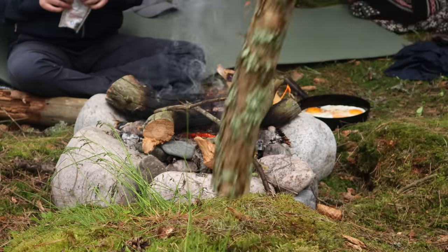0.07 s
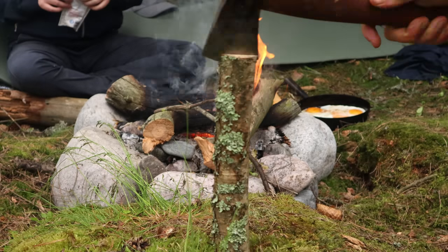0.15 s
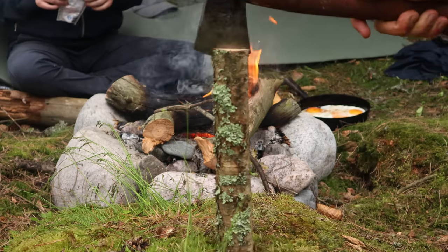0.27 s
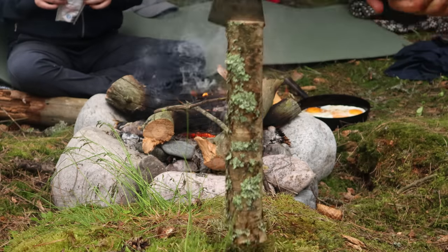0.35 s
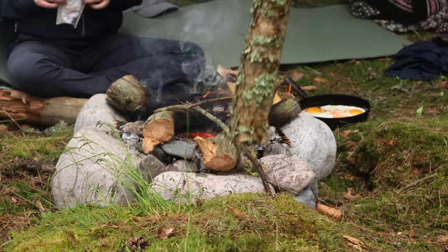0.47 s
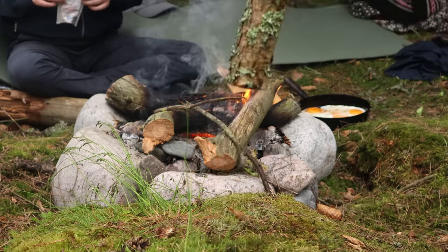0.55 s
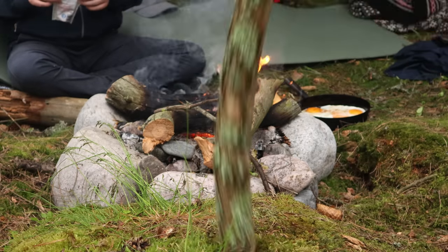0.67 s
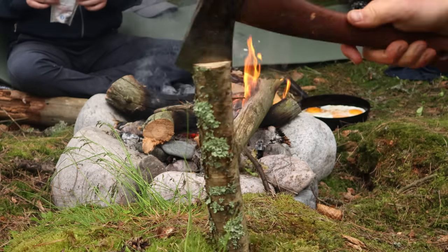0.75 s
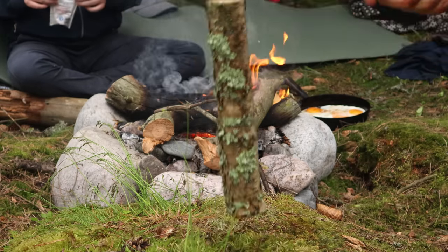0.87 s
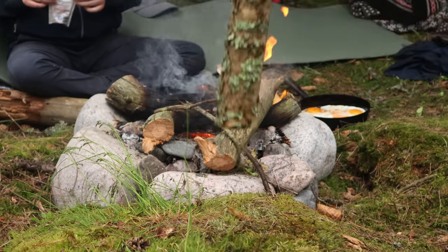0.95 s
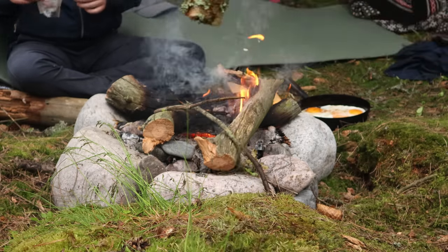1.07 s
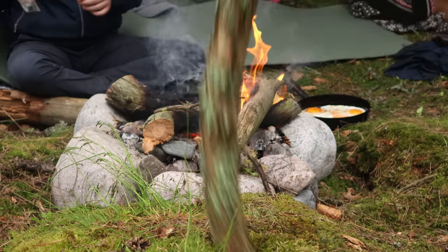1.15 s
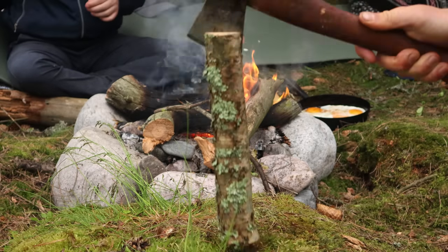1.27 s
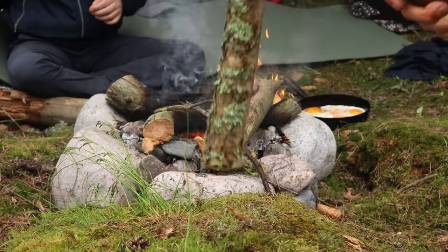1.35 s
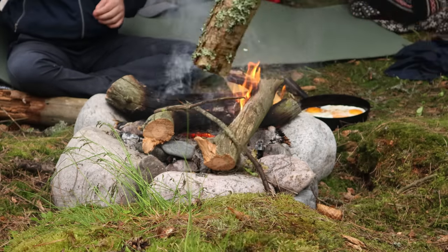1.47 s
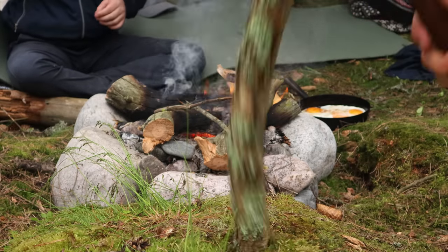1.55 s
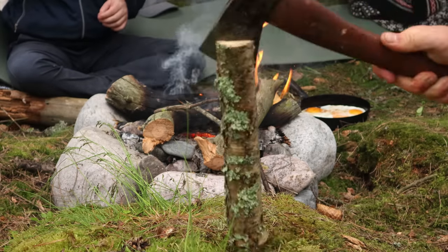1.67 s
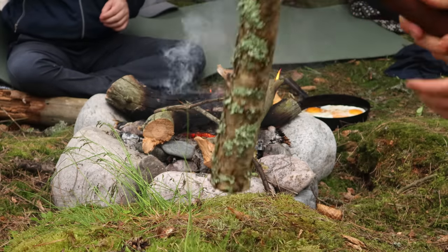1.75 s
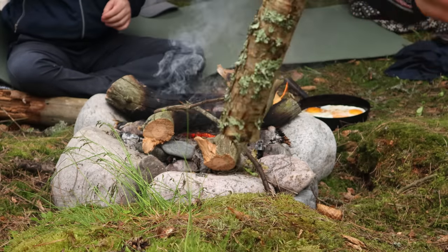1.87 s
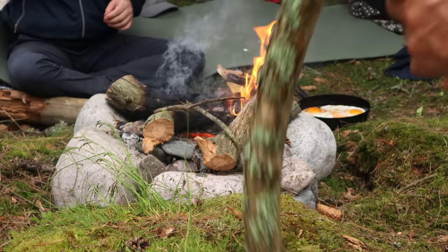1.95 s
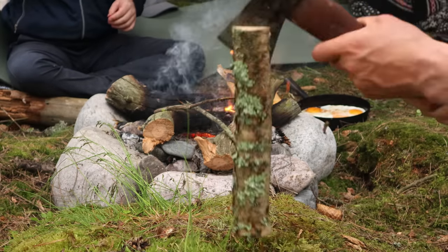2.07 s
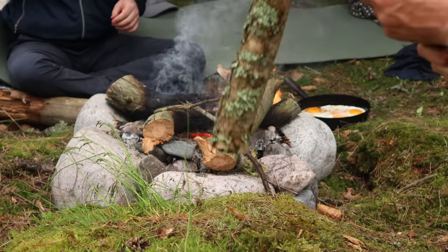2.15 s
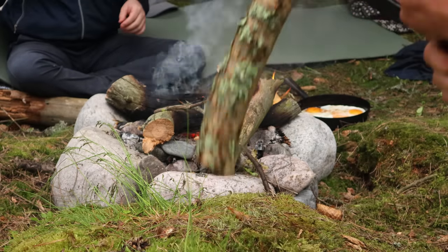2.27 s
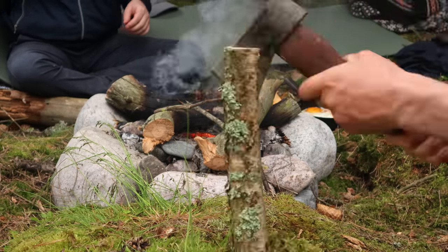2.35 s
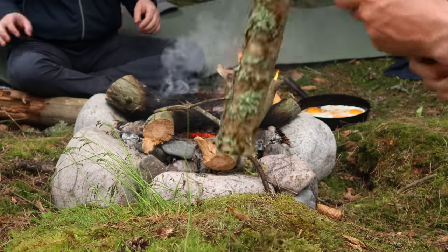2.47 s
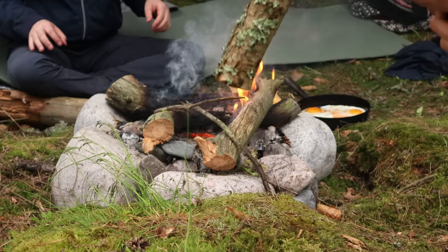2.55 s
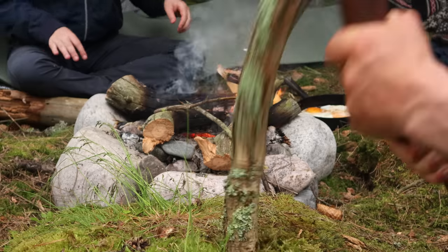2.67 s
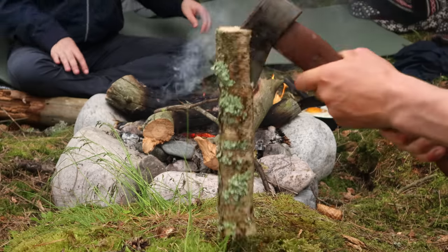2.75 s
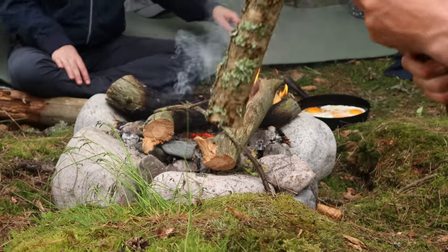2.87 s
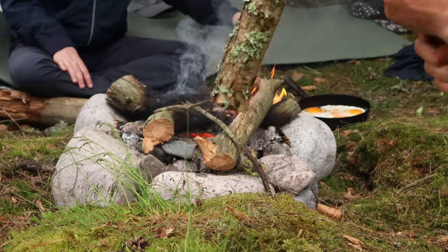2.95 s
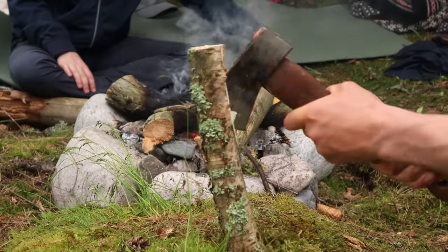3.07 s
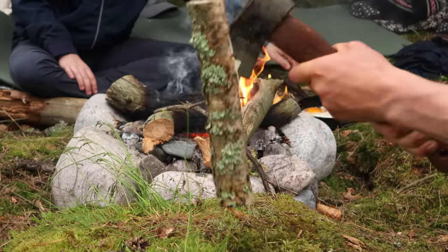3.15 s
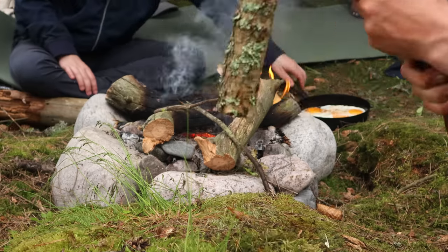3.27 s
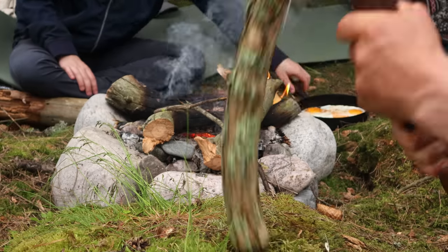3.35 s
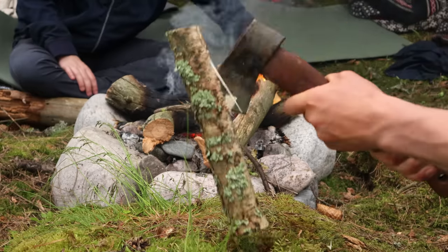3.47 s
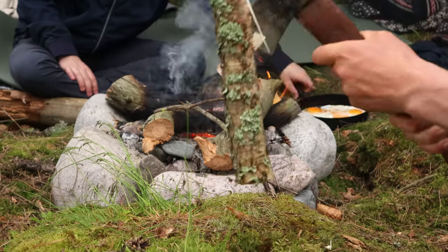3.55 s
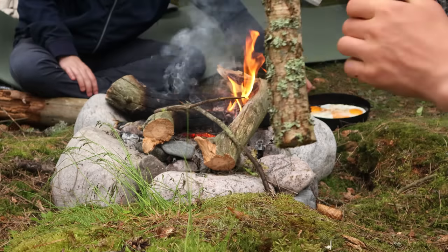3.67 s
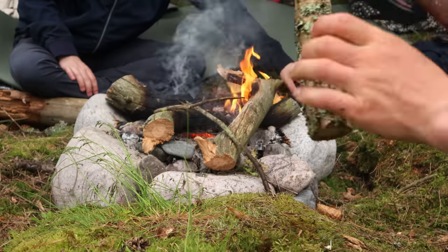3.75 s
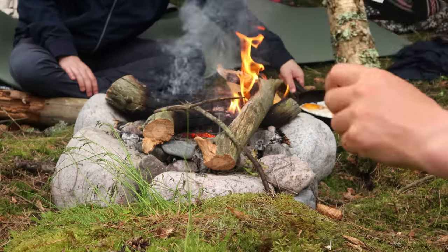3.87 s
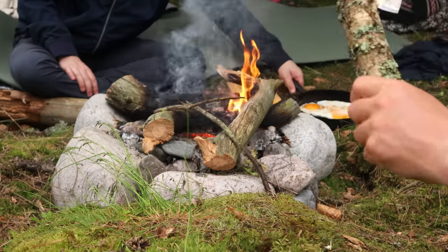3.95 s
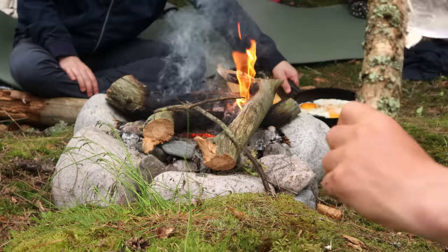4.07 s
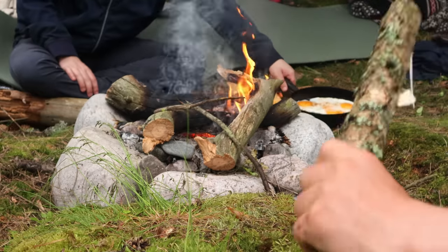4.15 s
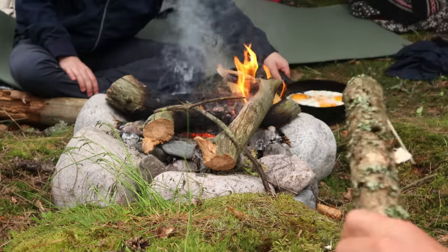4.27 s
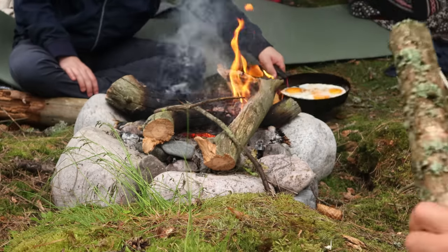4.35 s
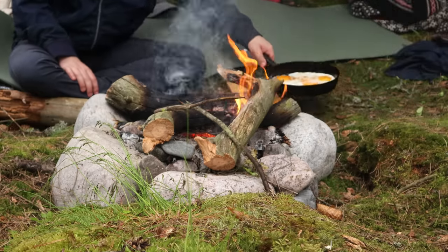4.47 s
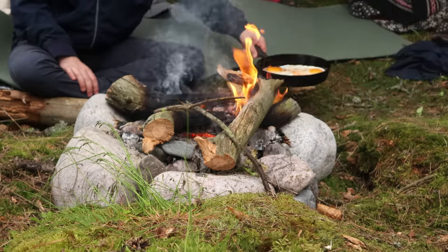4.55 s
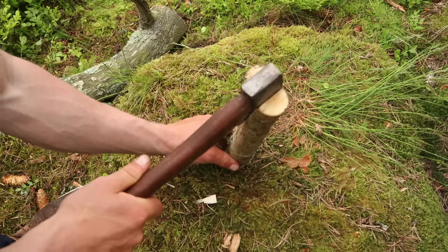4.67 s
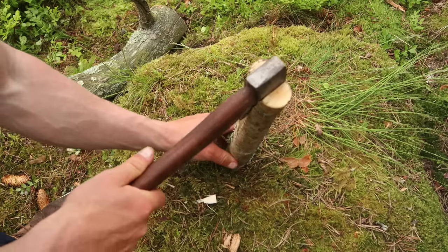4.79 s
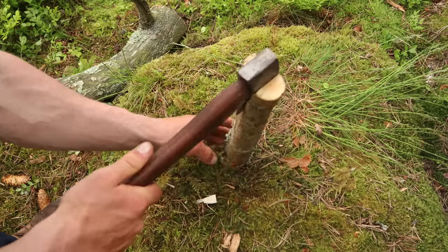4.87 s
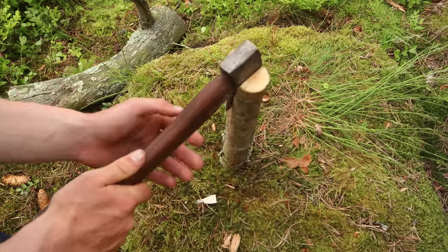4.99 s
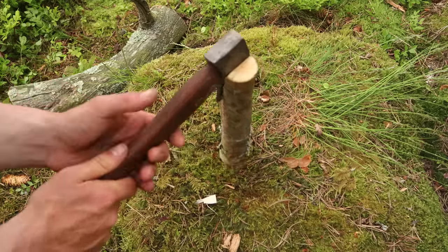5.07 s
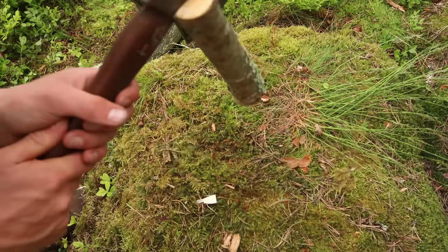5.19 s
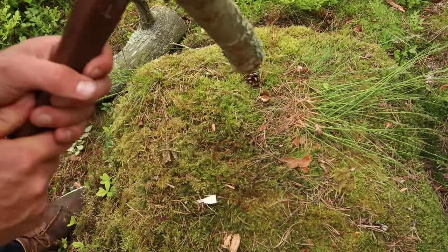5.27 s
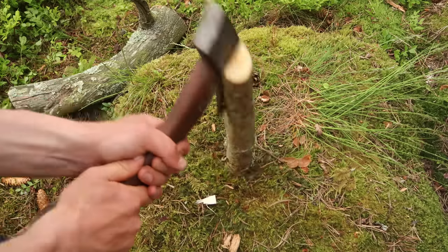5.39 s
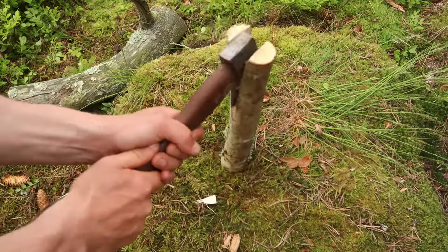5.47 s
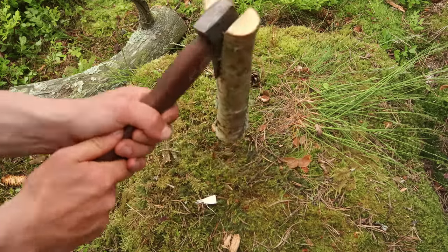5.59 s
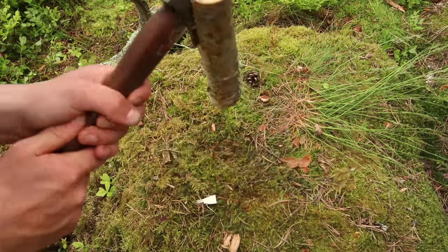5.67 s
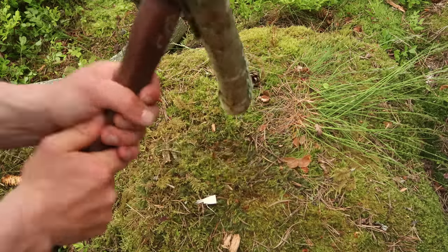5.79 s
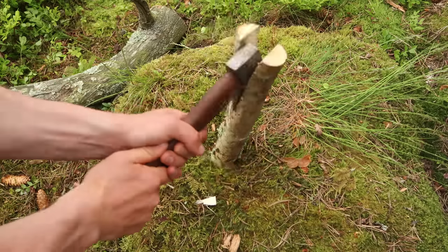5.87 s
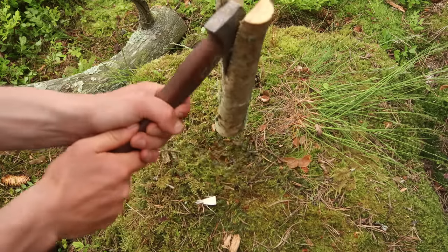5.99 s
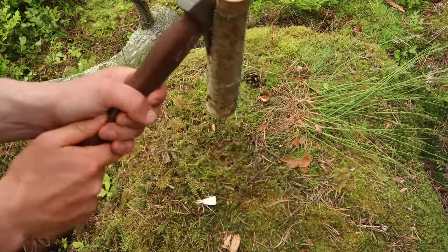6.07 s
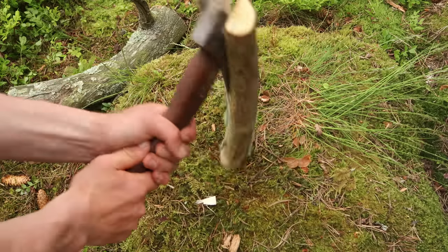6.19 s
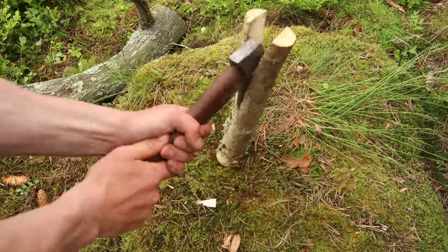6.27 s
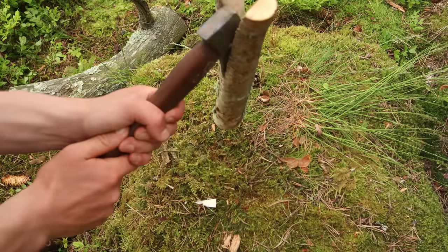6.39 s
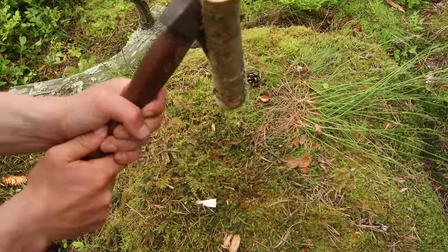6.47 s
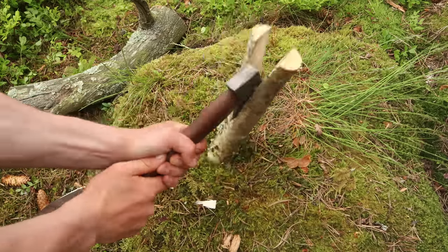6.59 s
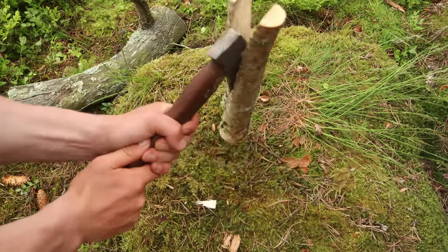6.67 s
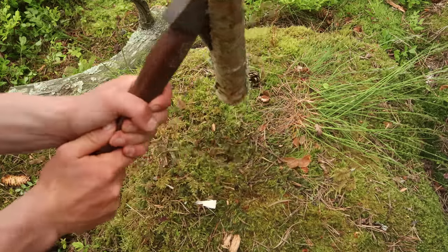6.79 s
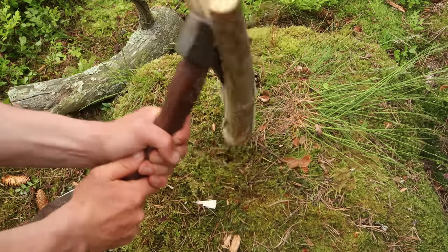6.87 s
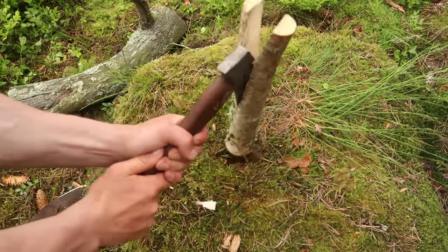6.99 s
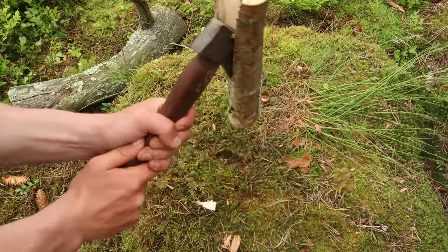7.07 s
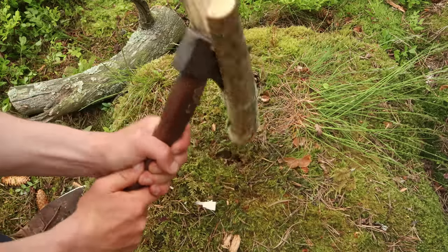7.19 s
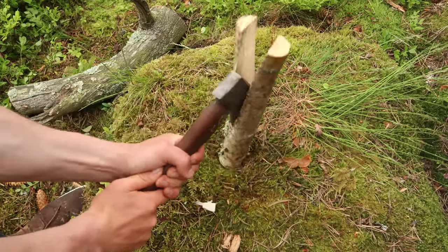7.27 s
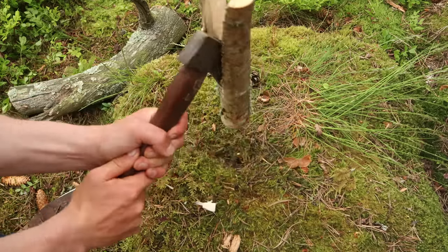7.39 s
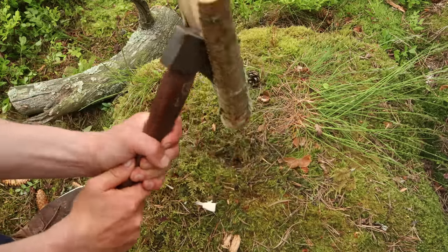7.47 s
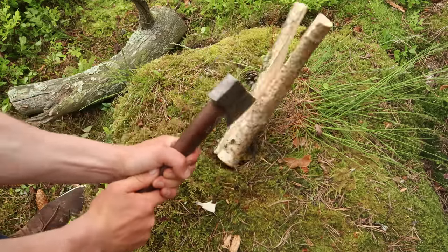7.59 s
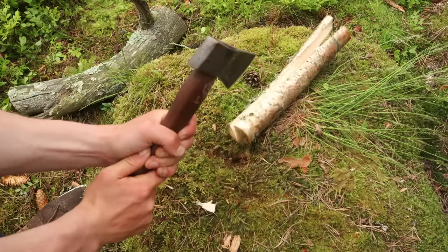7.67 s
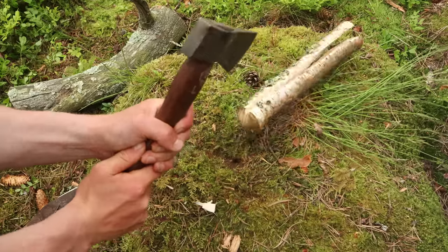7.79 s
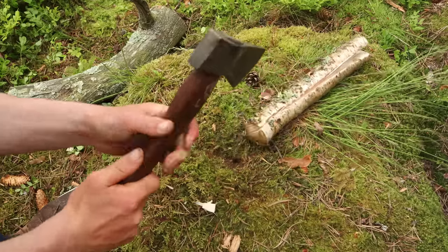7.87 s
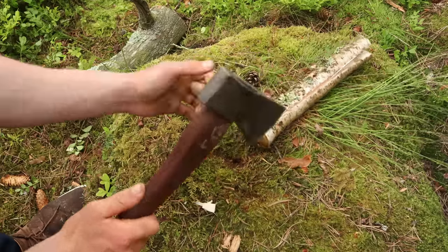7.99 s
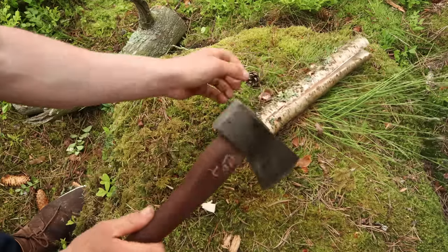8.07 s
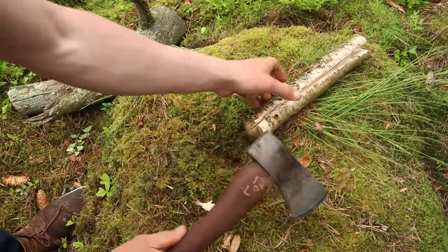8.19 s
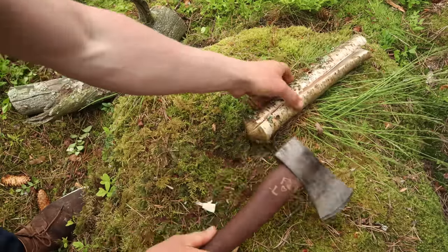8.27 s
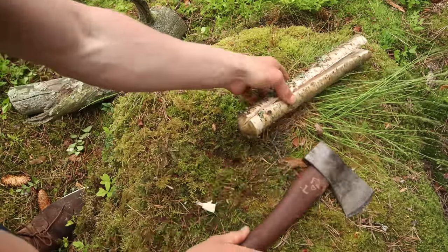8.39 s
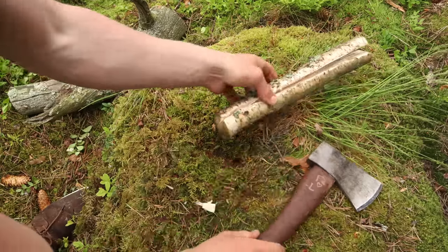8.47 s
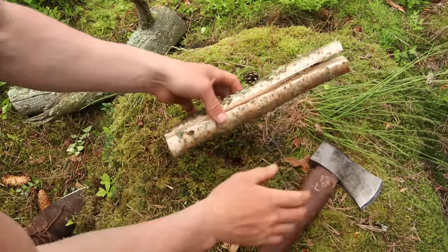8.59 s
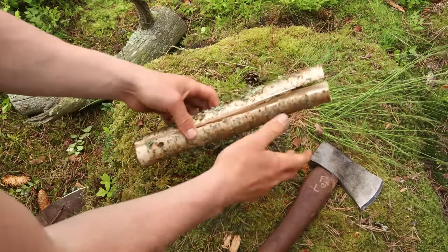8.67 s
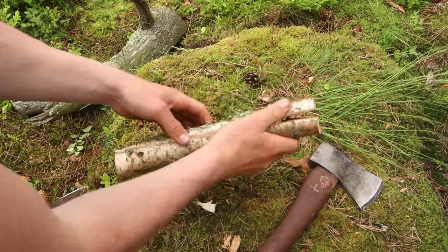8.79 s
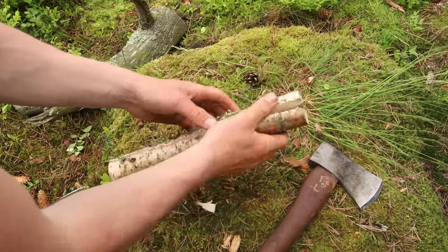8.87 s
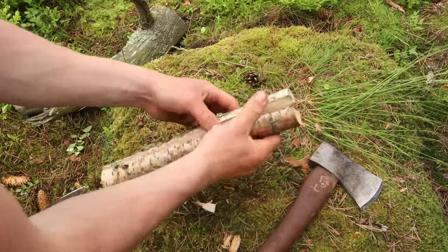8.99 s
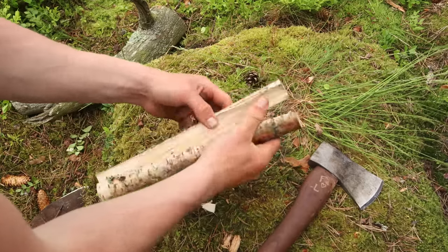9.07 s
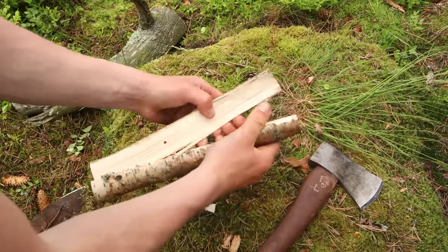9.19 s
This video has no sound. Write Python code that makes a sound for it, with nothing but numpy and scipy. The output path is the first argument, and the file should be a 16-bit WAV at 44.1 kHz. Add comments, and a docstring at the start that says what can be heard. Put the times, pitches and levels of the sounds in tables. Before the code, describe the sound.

Nine dull, woody thuds with sharp splintering cracks, a pause with a light clack, then seven more on a second stake, ending in a loud split.

```python
"""A hatchet wedged in a green stake is knocked down on mossy ground until the wood splits.
Nine blows fall on a first stake: each is a thud of damped resonances with a burst of tearing fibres and cracks.
Loose wood then bumps and rubs, and seven blows follow on a second stake, which also drags on the blade.
Rubbing and ticking splinters, as short ringing noise bursts and swelling gritty noise, close the work.
Throughout, embers snap faintly at random and shaped steady noise gives the hiss of a forest camp."""
import sys
import numpy as np
from scipy import signal
from scipy.fft import rfft, irfft
from scipy.io import wavfile
from scipy.ndimage import uniform_filter1d

SR = 44100
rng = np.random.default_rng(int(sys.argv[2]) if len(sys.argv) > 2 else 0)


def dump_mix(stems):
    """Bounce the given channels to the path in sys.argv[1] as a 16-bit WAV at rate SR."""
    frames = np.atleast_2d(stems).T  # one column per channel
    limited = np.clip(frames, -1, 1)  # hard clip at full scale
    pcm = np.round(limited * 32767).astype(np.int16)
    wavfile.write(sys.argv[1], SR, pcm)


N = 407484

# Blows of the stake on the ground. Each row: start in seconds, thud level in dB, knock level in dB,
# knock pitch in Hz, tearing level in dB, ring of the freed wood in Hz, treble tilt of the tearing in dB.
BLOWS = [ (0.2625, -1, -5, 910, 2.5, 1710, 0.5), (0.8284, 5.5, 5, 890, 2, 2140, -3),
         (1.313, 10.5, -2, 734, 7, 1900, -5), (1.7055, 6.5, 17, 885, 8, 2300, 2.5),
         (2.112, 3, -14, 1060, 3, 2480, -5), (2.4560, 8.5, 10, 710, 2, 2620, -5),
         (2.8162, 12.5, 14, 736, 10, 3030, 0), (3.1688, 15, 20, 860, 10.5, 2900, -6),
         (3.5194, 15, 23, 860, 11, 1370, -11.5), (5.523, 13, 5, 750, 4, 2230, -7),
         (5.969, 14, 6, 990, 6, 2340, -4), (6.3373, 13.5, 14.5, 970, 5.5, 2310, -3.5),
         (6.6830, 11, 6, 780, 5, 2500, 2.5), (7.0311, 14, 14, 970, 4, 1600, -6),
         (7.3562, 15, 11, 990, 7.5, 1460, -6), (7.6523, 16, 7, 760, 14.5, 1900, -8)]
# Cracks of fibre bundles. Each row: start in seconds, level in dB, ring in Hz, ring height in dB,
# treble tilt in dB.
CRACKS = [ (.2640, -0.5, 2770, 15.5, 3), (0.8317, 0, 2920, 14, 9.5), (1.3133, 5.5, 2850, 13.5, -4),
          (1.3145, 4, 7700, 14, -3), (1.3162, 7.5, 2280, 13.5, 2.5), (1.7077, 8, 1740, 8.5, -5),
          (1.7098, 13, 4440, 13, -4), (2.112, 6.5, 2550, 9.5, -3.5), (2.1136, 4.5, 4900, 5, 1.5),
          (2.4571, 4, 2680, 19, 7.5), (2.4583, 10, 7500, 9, -2.5), (2.4640, 6.5, 3200, 13, 2),
          (2.8223, 7.5, 3730, 12.5, 0.5), (3.1689, 14, 3820, 12.5, -10), (3.1762, -5.5, 7640, 4.5, 15),
          (3.5186, 10, 3800, 8, -11.5), (4.2188, .5, 4560, 6.5, -3), (5.5278, 5, 3480, 7, -6),
          (5.5364, -10, 8230, 21.5, 2), (5.971, 1.5, 2450, 20, -10), (5.9747, 8, 3650, 3.5, -5),
          (6.3380, 8, 1500, 10.5, -20), (6.6849, 6, 2450, 9.5, -4.5), (7.0330, 4.5, 2380, 11, -.5),
          (7.3579, 3.5, 2230, 16, 6), (7.362, 6, 3160, 10, 3), (7.6548, 10, 3200, 15.5, -5.5),
          (7.657, 20, 2400, 10, -4), (7.6605, 8.5, 4900, 11.5, -4)]
# Ticks of splinters, bark and embers. Each row: start in seconds, level in dB, ring in Hz,
# ring height in dB, treble tilt in dB.
TICKS = [ (.0871, -25, 10500, 7, 18), (.3910, -15.5, 2500, -1, -8), (.9910, -26.5, 4000, 2, 5.5),
         (1.7448, -17, 4500, 6, 6), (1.8177, -31, 10200, 22, 3.5), (2.1552, -15.5, 4000, 3, 2),
         (2.887, -15.5, 13900, 15, -7), (3.1006, -23, 4800, 10, 2), (3.6173, -18.5, 3120, 14, 4.5),
         (4.904, -19, 7000, -1, 12), (5.1695, -23.5, 5000, 1, -1), (6.1136, -23.5, 9300, 8.5, 2),
         (6.2115, -23.5, 3000, 8, -2.5), (6.4244, -17, 2240, 15, 9.5), (7.0566, -8, 7500, 6, -3.5),
         (7.5580, -31, 7000, 13, 9.5), (7.6850, -20, 2390, 19, -10), (7.7204, -11, 2900, 4, 2.5),
         (8.0851, -26.5, 3820, 8, 3), (8.3035, -31.5, 8600, 6, 10), (9.1396, -27.5, 3300, 6, 13),
         (9.178, -20, 3200, 9, 9), (9.2280, -26.5, 4000, 6, 6)]
# Wood rubbing on wood, steel or moss. Each row: time of the peak in seconds, level in dB,
# rise constant in seconds, fall constant in seconds.
RUBS = [(4.165, -50.5, 0.037, 0.056), (4.216, -30.5, 0.0058, 0.0068), (7.690, -46.5, 0.01, 0.024),
        (7.815, -54.5, 0.013, .013), (8.550, -61, .019, .049), (8.915, -58.5, .02, .02),
        (9.171, -56.5, .045, 0.098)]
# Spectrum of the thud. Each row: frequency in Hz, level in dB.
THUD_SPECTRUM = [(60, -39.5), (165, -21.5), (230, -6), (330, -1.5), (520, -2.5), (750, -6), (1200, -13.5),
                 (2500, -17.5), (8000, -51.5)]
# Spectrum of breaking wood. Each row: frequency in Hz, level in dB.
WOOD_SPECTRUM = [(150, -29.5), (500, -15), (1200, -9), (1700, -3.5), (2500, -1.5), (4000, -1.5),
                 (5300, -2.5), (7800, 1), (10000, -5.5), (12500, -2.5), (15500, -7)]
# Spectrum of the forest hiss. Each row: frequency in Hz, level in dB.
FOREST_SPECTRUM = [(15, -57), (25, -3.5), (123, 0), (255, -2), (284, -2), (414, -4), (513, -4.5), (604, -4),
                   (1180, -5.5), (1360, -5.5), (2390, -6), (3050, -6.5), (3680, -6), (12400, -7.5),
                   (15800, -10.5)]
# Spectrum of rubbing. Each row: frequency in Hz, level in dB.
RUB_SPECTRUM = [(300, -22.5), (900, -14), (2200, 1), (4000, -1), (5500, 1), (7800, 5), (10000, -3.5),
                (15500, -7.5)]
# The two stakes. Each row: first use in seconds, hum pitch in Hz, hum level in dB, rebound delay in ms,
# rebound level in dB, first ground boom in dB, first tearing decay in ms, its change per blow in ms.
STAKES = [(0, 224, -47.5, 3.72, -25, -0.5, 1.96, 0.2), (4.6, 197.5, -48, 3.92, -16.5, -5.5, 6.9, -0.58)]
# Low thumps of the recorder overloading at two heavy blows. Each row: start in seconds, level in dB.
OVERLOAD_THUMPS = [(3.168, -7), (7.6563, 3.5)]
# Light knocks of loose wood. Each row: start in seconds, level in dB, pitch in Hz.
KNOCKS = [(.8670, -12, 900), (.9430, -17, 1000), (4.2185, -4.5, 950)]

TOP_HZ = 15900  # upper limit of the recorder
SIZE = 8192  # samples in one short sound
AGE = np.arange(SIZE) / SR  # seconds since a short sound began
FREQS = np.fft.rfftfreq(SIZE, 1 / SR) + 1  # Hz, kept above zero for the logarithm
TIME = np.arange(N) / SR

THUD_HZ, THUD_RISE_HZ_PER_DB = 423, 9  # a harder blow is a shorter contact, so a higher thud
PACKING_DB_PER_BLOW = 1  # the moss packs down and booms less
LOW_RING_DB, HIGH_RING_HZ, HIGH_RING_DB = 10.5, 7700, 3  # rings of the tearing wood
CRACK_DECAY_MS = 0.92
# after every blow a few splinters spring back, the later the fainter
SETTLE_S, SETTLE_DB, SETTLE_FADE_DB_PER_S = 0.13, -23.5, 54
# bark catches and snaps wherever wood is rubbed
SNAG_DB, SNAG_SPREAD_S = -33.5, 0.04
CHIP_RING_DB = 7  # ring height of the small random chips
# the split wood of the second stake drags on the blade after each blow
DRAG_LAG_S, DRAG_DB, DRAG_RISE_S, DRAG_FALL_S = 0.026, -50.5, 0.015, 0.025
FOREST_DB = -57.5


def undb(db):
    """Definition of the decibel: the gain grows tenfold every 20 dB."""
    return 10 ** (np.asarray(db) / 20)


def curve_db(points, freqs):
    """Spectral envelope: levels joined by straight lines on a log-frequency axis."""
    hz, db = np.transpose(points)
    return np.interp(np.log(freqs), np.log(hz), db)


def bell(hz, q):
    """Resonance curve: 1 at the centre, narrower for a higher q."""
    return 1 / (1 + (q * (FREQS / hz - hz / FREQS)) ** 2)


def response(db):
    """Minimum phase: the causal ring of a body that has this gain at each frequency."""
    cepstrum = irfft(np.log(undb(db)))
    # folding the cepstrum forward makes the ring causal
    cepstrum[1:SIZE // 2] *= 2
    cepstrum[SIZE // 2 + 1:] = 0
    return irfft(np.exp(rfft(cepstrum)))


def noise(points):
    """Filtered noise: steady randomness of a given spectrum, rms 1."""
    freqs = np.fft.rfftfreq(N, 1 / SR) + 1
    shaped = irfft(rfft(rng.standard_normal(N)) * undb(curve_db(points, freqs)), N)
    return shaped / shaped.std()


def add(track, s, sound, size=256):
    """Superposition: mix in a sound at time s; the end of its ring buffer is the short swell before it."""
    start = int(np.clip(s * SR - size, 0, N - 1))
    track[start:start + SIZE] += np.roll(sound, size)[:N - start]


def burst(decay_ms, grit, rise, size=110):
    """Shot noise: tiny uneven fractures build up and die, with equal energy in all bands."""
    decay_s = max(decay_ms, 0.1) / 1000
    # rise is a fraction of the decay
    envelope = np.exp(-AGE / decay_s) * (1 - np.exp(-AGE / (rise * decay_s)))
    sizes = np.exp(grit * rng.standard_normal(SIZE))
    shower = rfft(rng.standard_normal(SIZE) * sizes * envelope)
    band_power = uniform_filter1d(np.abs(shower) ** 2, size)
    return irfft(shower / np.sqrt(band_power))


def echoed(sound, near_db, near_s):
    """Early scattering: ground and stones return each sound at once, with a new pattern every time."""
    echoes = rng.standard_normal(SIZE) * np.exp(-AGE / near_s) * (1 - np.exp(-AGE / 0.0026))
    echoes = undb(near_db) * echoes / np.linalg.norm(echoes)
    # little bass comes back from moss and twigs
    scatter = rfft(echoes) * FREQS / np.hypot(FREQS, 900)
    return irfft(rfft(sound) * (1 + scatter))


def fracture(db, rings, treble_db, decay_ms, q=3.5, grit=0.5, rise=0.3, echo_db=-14, treble_hz=5500):
    """Excitation and resonance: breaking fibres ring the wood; rings hold (Hz, height dB) of splinters."""
    colour = curve_db(WOOD_SPECTRUM, FREQS) + sum(height * bell(hz, q) for hz, height in rings)
    treble = treble_db * FREQS ** 4 / (FREQS ** 4 + treble_hz ** 4)
    body = response(db + colour + treble)
    ring = irfft(rfft(burst(decay_ms, grit, rise)) * rfft(body))
    return echoed(ring, near_db=echo_db, near_s=0.0084)


def blows():
    """Damped impact: the stake on moss thuds, ground booms, axe head knocks, a hum dies, fibres tear."""
    out = np.zeros(N)
    for s, thud_db, knock_db, knock_hz, tear_db, ring_hz, treble_db in BLOWS:
        stake = STAKES[int(s > STAKES[1][0])]
        first_s, hum_hz, hum_db, rebound_ms, rebound_db, boom_db, decay_ms, decay_step_ms = stake
        earlier = sum(first_s <= blow[0] < s for blow in BLOWS)  # blows this stake has already taken

        thud_peak = 6.7 * bell(THUD_HZ + THUD_RISE_HZ_PER_DB * thud_db, q=2.8)
        thud = undb(thud_db + curve_db(THUD_SPECTRUM, FREQS) + thud_peak)
        boom = undb(boom_db - PACKING_DB_PER_BLOW * earlier) * bell(160, q=1.6)
        knock = undb(knock_db) * bell(knock_hz, q=3.4)
        body = response(10 * np.log10(thud ** 2 + boom ** 2 + knock ** 2))
        hum = undb(hum_db) * np.sin(2 * np.pi * hum_hz * AGE) * np.exp(-AGE / 0.023)
        add(out, s, echoed(body, near_db=-11.0, near_s=0.0058) + hum)
        # a weaker second contact follows at once and hollows the thud
        add(out, s + rebound_ms / 1000, undb(rebound_db) * body)

        rings = [(ring_hz, LOW_RING_DB), (HIGH_RING_HZ, HIGH_RING_DB)]
        tear_ms = decay_ms + decay_step_ms * earlier
        tearing = fracture(tear_db, rings, treble_db, tear_ms, q=4.75, grit=0.4, rise=0.13, echo_db=-14)
        add(out, s, tearing)
    # the overloading recorder adds a low thump, low-passed at 140 Hz
    for s, db in OVERLOAD_THUMPS:
        add(out, s, response(db - 10 * np.log10(1 + (FREQS / 140) ** 4)))
    return out


def cracks():
    """Stepwise fracture: the split jumps forward in sharp steps, and small splinters tick around it."""
    out = np.zeros(N)
    for s, db, ring_hz, ring_db, treble_db in CRACKS:
        rings = [(ring_hz, ring_db)]
        crack = fracture(db, rings, treble_db, CRACK_DECAY_MS, q=3.9, grit=0.19, rise=0.16, echo_db=-15.5)
        add(out, s, crack)
    for s, db, ring_hz, ring_db, treble_db in TICKS + settling() + snags():
        # small splinters radiate little below their own ring
        rings = [(ring_hz, ring_db), (1200, -8)]
        tick = fracture(db, rings, treble_db, decay_ms=0.91, q=4.7, grit=0.5, rise=0.163, echo_db=-9.5)
        add(out, s, tick)
    return out


def settling(count=2):
    """Elastic relaxation: random ticks in the wake of each blow, as rows like those of TICKS."""
    rows = []
    for blow, draws in zip(BLOWS, rng.random((len(BLOWS), count, 2))):
        for late, pitch in draws:
            lag_s = SETTLE_S * late
            db = SETTLE_DB - SETTLE_FADE_DB_PER_S * lag_s
            rows.append((blow[0] + lag_s, db, 2200 * 2.5 ** pitch, CHIP_RING_DB, 0))
    return rows


def snags(count=3):
    """Stick and release: random ticks around the peak of each rub, as rows like those of TICKS."""
    rows = []
    for rub, draws in zip(RUBS, rng.standard_normal((len(RUBS), count, 3))):
        for late, size, pitch in draws:
            s = rub[0] + SNAG_SPREAD_S * late
            rows.append((s, SNAG_DB + 2.5 * size, 3800 * 1.4 ** pitch, CHIP_RING_DB, 4))
    return rows


def knocks():
    """Heavily damped resonance: loose wood bumps and falls silent at once."""
    out = np.zeros(N)
    for s, db, hz in KNOCKS:
        bump = response(db + 20 * np.log10(bell(hz, q=1.0)))
        add(out, s, echoed(bump, near_db=-5, near_s=0.0048))
    return out


def rubs():
    """Dry friction: gritty noise swells with the pressure and lets go."""
    drags = [(blow[0] + DRAG_LAG_S, DRAG_DB, DRAG_RISE_S, DRAG_FALL_S)
             for blow in BLOWS if blow[0] > STAKES[1][0]]
    pressure = np.zeros(N)
    for s, db, rise, fall in RUBS + drags:
        pressure += undb(db) * np.exp(-np.maximum((s - TIME) / rise, (TIME - s) / fall))
    # the grip takes a new random strength every 64 samples
    slips = np.exp(0.3 * np.repeat(rng.standard_normal(N // 64 + 1), 64)[:N])
    return pressure * slips * noise(RUB_SPECTRUM)


def crackle(count=40):
    """Random impulses: faint scattered snaps of embers and dry needles."""
    out = np.zeros(N)
    for when, size, pitch in rng.random((count, 3)):
        rings = [(2500 + 9000 * pitch, 12)]
        snap = fracture(-43 + 7 * size, rings, treble_db=7.5, decay_ms=0.84)
        add(out, when * N / SR, snap)
    return out


def trees(x, far_db, far_s):
    """Late reverberation: the trunks return a faint, longer tail with little bass."""
    age = TIME[:SR // 2]
    echoes = rng.standard_normal(len(age)) * np.exp(-age / far_s) * (1 - np.exp(-age / 0.006))
    band = signal.butter(1, [700, 10000], "band", fs=SR, output="sos")
    tail = signal.sosfilt(band, echoes / np.linalg.norm(echoes))
    return undb(far_db) * signal.fftconvolve(x, tail)[:N]


def forest():
    """Stationary noise: an even, distant hiss."""
    return noise(FOREST_SPECTRUM) * undb(FOREST_DB)


def scene():
    """Superposition of the woodwork and embers, their echoes and the background."""
    work = blows() + cracks() + knocks() + crackle() + rubs()
    return (work + trees(work, far_db=-38.5, far_s=0.068) + forest())[None]


def record(dry):
    """Overload and band limit: the hardest cracks are clipped by the recorder; the top is cut."""
    overloaded = np.clip(dry, -0.85, 0.85)
    top_cut = signal.ellip(10, 0.2, 70, TOP_HZ, fs=SR, output="sos")
    return signal.sosfilt(top_cut, overloaded)


dry = scene()
out = record(dry)
dump_mix(out)
```